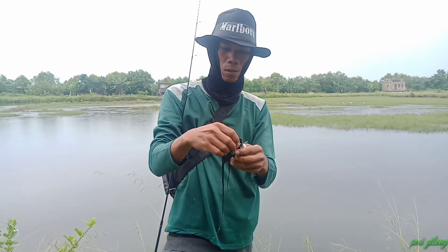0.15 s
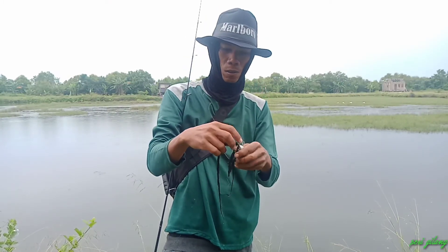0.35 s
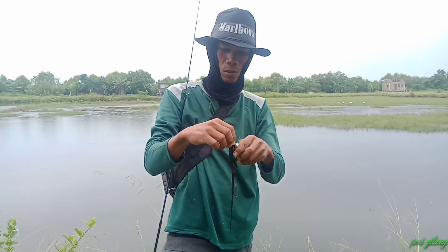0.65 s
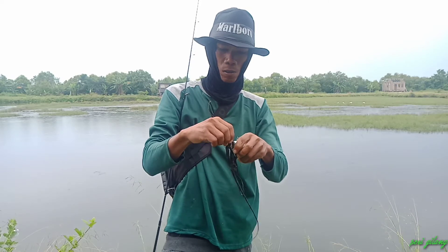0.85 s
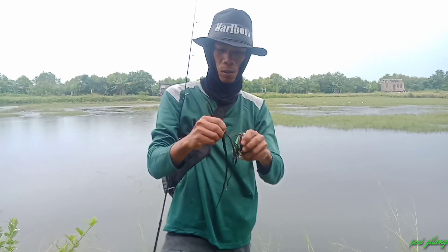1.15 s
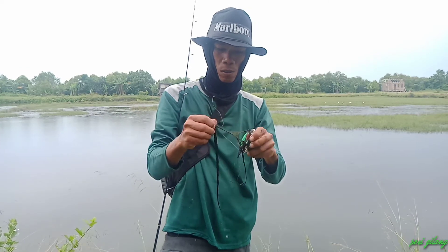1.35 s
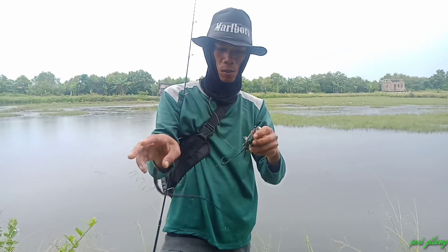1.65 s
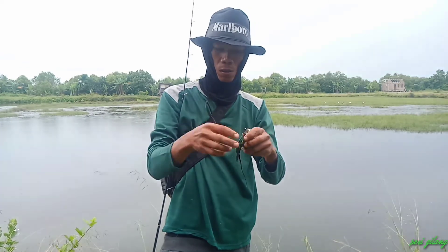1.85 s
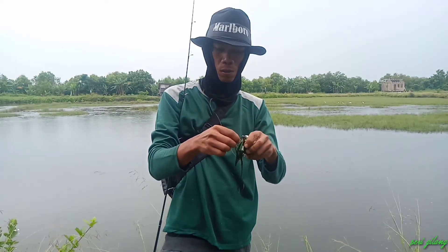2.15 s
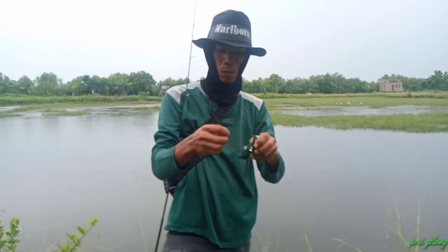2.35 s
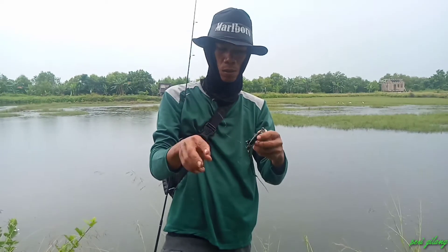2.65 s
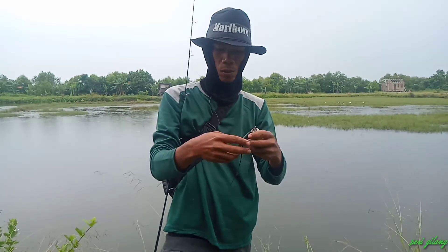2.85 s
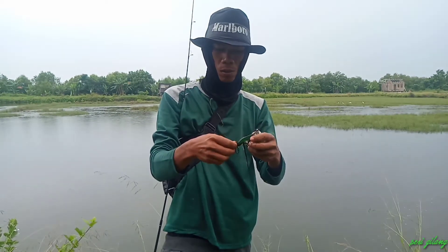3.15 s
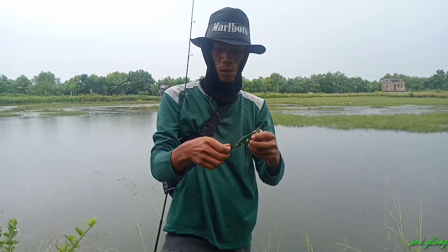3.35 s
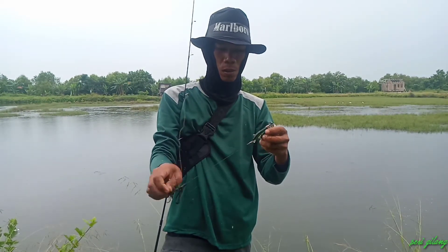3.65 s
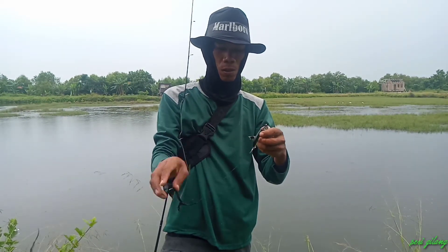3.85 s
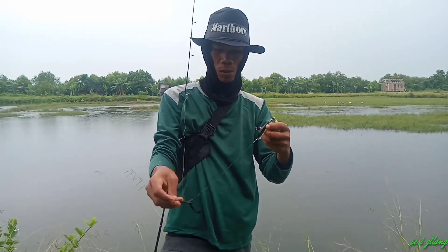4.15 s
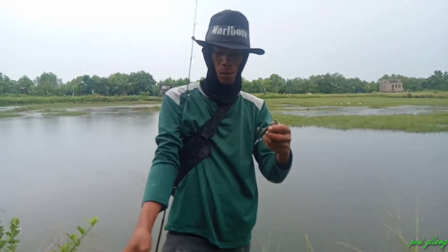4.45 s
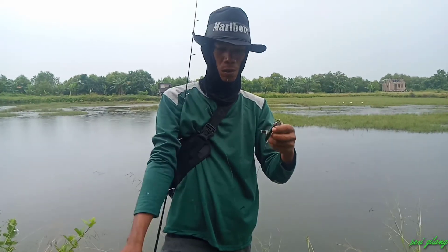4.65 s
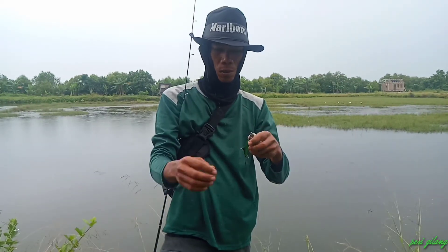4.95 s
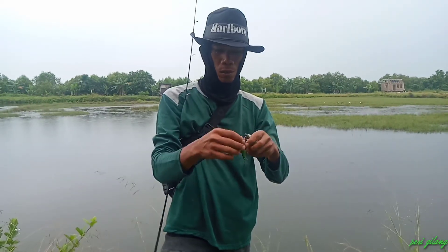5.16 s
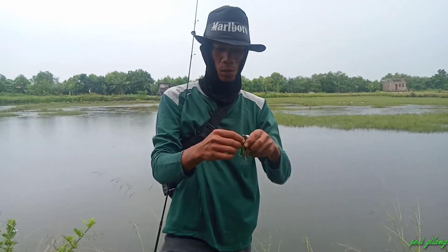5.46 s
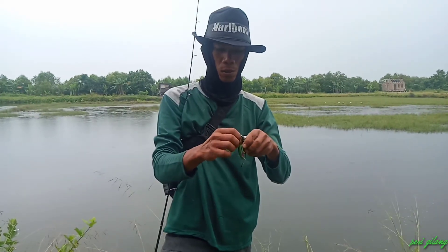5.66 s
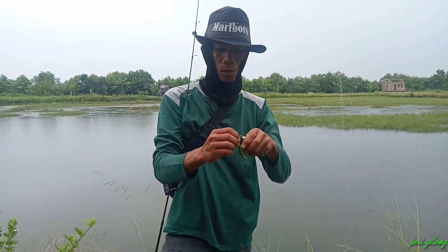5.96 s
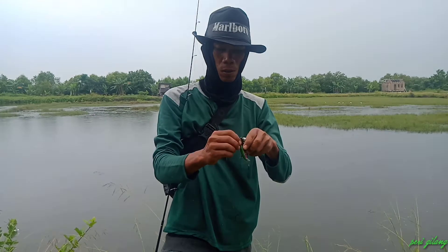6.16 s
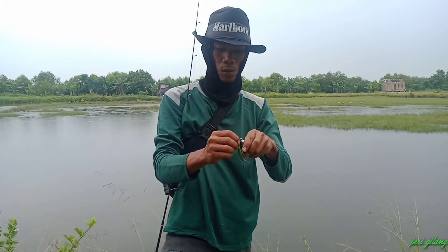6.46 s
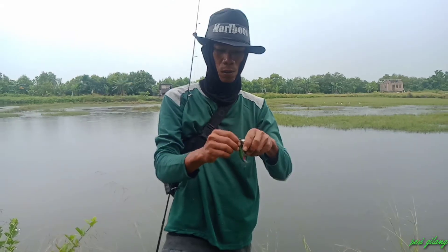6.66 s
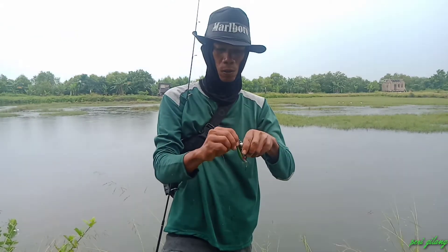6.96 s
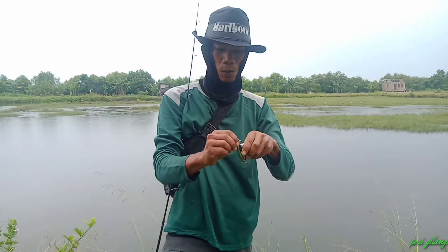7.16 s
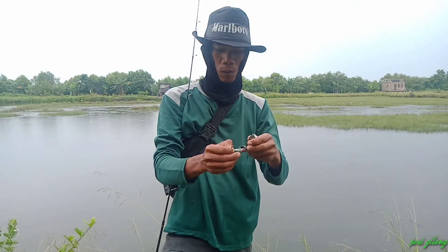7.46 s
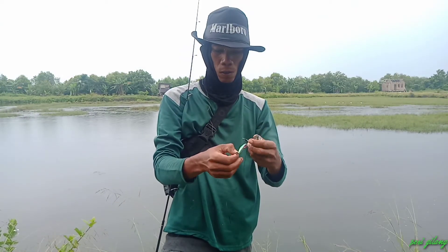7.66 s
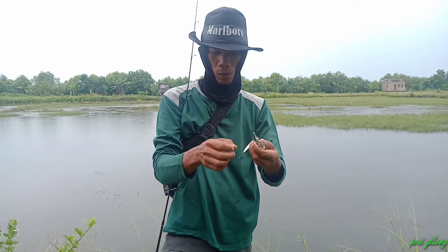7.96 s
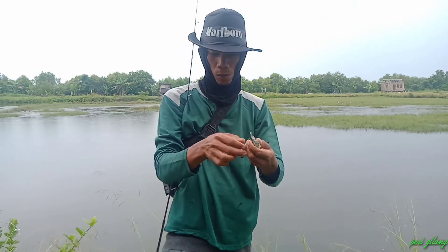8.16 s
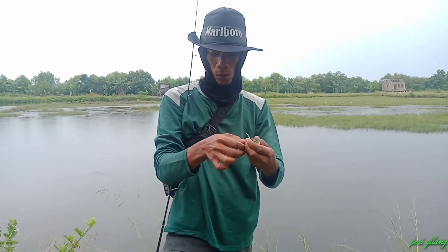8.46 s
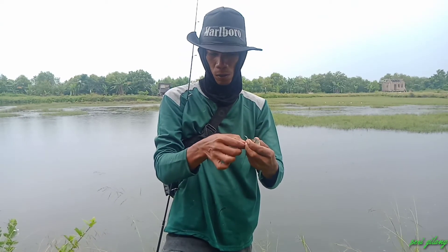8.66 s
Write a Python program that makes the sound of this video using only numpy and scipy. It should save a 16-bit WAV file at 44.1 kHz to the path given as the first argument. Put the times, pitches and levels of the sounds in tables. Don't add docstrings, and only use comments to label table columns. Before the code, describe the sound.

Whistling songbirds repeat bright phrases over a marshy pond while a near cricket trills and low wind rumbles on the microphone.

```python
import sys
import numpy as np
from scipy import signal
from scipy.fft import rfft, irfft, next_fast_len
from scipy.io import wavfile
from scipy.ndimage import uniform_filter1d, map_coordinates

SR = 44100
rng = np.random.default_rng(int(sys.argv[2]) if len(sys.argv) > 2 else 0)


def generate_wav(signal):
    frames = np.transpose(np.atleast_2d(signal))
    scaled = np.clip(frames, -1, 1) * 32767
    pcm = np.round(scaled).astype(np.int16)
    wavfile.write(sys.argv[1], SR, pcm)


def boost(x):
    u = np.asarray(x, float) / 20
    return 10 ** u


N = 388521

# (time from accent [s], pitch [Hz], level [dB])
DROP_NOTE = [(-0.004, 2800, 0.5), (0, 2787, 1.5), (0.006, 2570, -2), (0.014, 2010, -13)]


def unit(x):
    return x / np.sqrt(np.mean(x ** 2) + 1e-20)


def along(points, hz):
    f, v = np.transpose(points)
    return np.interp(np.log(hz + 1), np.log(f + 1), v)


def wobble(rate_hz):
    coarse = np.arange(0, N + 16, 16)
    knots = rng.standard_normal(int(N * rate_hz / SR) + 4)
    return np.interp(np.arange(N), coarse, map_coordinates(knots, [coarse * rate_hz / SR]))


def coloured(x, spectrum):
    m = next_fast_len(N + 8192)
    response = boost(along(spectrum, np.fft.rfftfreq(m, 1 / SR)))
    return irfft(rfft(x, m) * response, m)[:N]


def rush(spectrum, patchy_db):
    z = signal.stft(rng.standard_normal(N + 512), nperseg=512)[2]
    field = uniform_filter1d(rng.standard_normal(z.shape), size=5, axis=0)
    field = uniform_filter1d(field, size=10, axis=1)
    noise = signal.istft(z * boost(patchy_db * unit(field)), nperseg=512)[1][:N]
    return unit(coloured(noise, spectrum))


def add(track, s, sound):
    k = round(s * SR)
    sound = sound[max(-k, 0):max(len(track) - k, 0)]
    track[max(k, 0):max(k, 0) + len(sound)] += sound


def whistle(hz, db, fade_s):
    t = np.arange(len(hz)) / SR
    ends = np.clip(np.minimum(t, t[-1] - t) / fade_s, 0, 1)
    return np.sqrt(2) * boost(db) * ends * np.sin(2 * np.pi * np.cumsum(hz) / SR)


def tail(stretch):
    # (frequency [Hz], t60 [s])
    decay_s = [(500, .35), (3000, .45), (6000, .45)]
    hz, t, z = signal.stft(rng.standard_normal(SR // 2), SR, nperseg=128)
    t60_s = stretch * along(decay_s, hz)[:, None]
    answer = signal.istft(z * boost(-60 * t / t60_s), SR, nperseg=128)[1]
    return answer / np.linalg.norm(answer)


def echo(x, answer):
    return signal.oaconvolve(x, answer)[:N]


def wind():
    # (time [s], strength [dB])
    gusts = [
        (0.0, -55.5),
        (0.17, -59),
        (1.2, -56.5),
        (5.03, -57),
        (5.28, -55),
        (5.67, -60.5),
        (6.65, -52),
        (7.29, -60.5),
        (7.95, -53.5),
        (8.81, -56.5),
    ]
    # (frequency [Hz], density [dB/Hz])
    rumble_spectrum = [(12, -46), (20, -26), (32, -28.5), (65, -2), (92, 2), (153, -7), (304, -22),
                       (395, -35), (450, -48.5), (580, -60), (990, -120)]
    # (frequency [Hz], density [dB/Hz])
    grass_spectrum = [(240, -25.5), (400, -6.5), (461, -6.5), (583, -3.5), (725, -8), (797, -8), (954, -7),
                      (1260, -1), (1410, -1), (2600, -3), (3380, -30.5), (5720, -120)]
    # (frequency [Hz], density [dB/Hz])
    reed_spectrum = [(1800, -39), (2600, 1.5), (3300, 2), (4100, -2), (4600, 2), (5200, -36.5),
                     (6000, -120)]
    # (frequency [Hz], density [dB/Hz])
    hiss_spectrum = [(4500, -48), (5200, -5), (5500, -13.5), (5800, -20), (6000, -8), (6300, -1.5),
                     (7000, -2), (7500, -5.5), (7900, -16), (8400, -5.5), (9400, -9), (10000, -19.5),
                     (10800, -20.5), (15500, -22)]
    stem_spectrum = [(330, -40), (440, -3), (600, 0.5), (720, -40)]
    t = np.arange(N) / SR
    strength_db = np.interp(t, *np.transpose(gusts))
    gust_db = strength_db - strength_db.mean()

    rumble_db = -31 + 0.11 * gust_db + 0.1362 * t
    rumble = boost(rumble_db) * unit(boost(0.72 * wobble(7)) * rush(rumble_spectrum, patchy_db=1.48))
    grass_db = strength_db + 4.5 + 1.37 * wobble(9)
    grass = boost(grass_db) * rush(grass_spectrum, patchy_db=3.6)
    reeds_db = -53.5 - .2 * gust_db + 1.2 * wobble(8.1)
    reeds = boost(reeds_db) * rush(reed_spectrum, patchy_db=4.5)
    hiss = boost(-63.5) * rush(hiss_spectrum, patchy_db=1.3)
    stems_db = -64 + .7 * gust_db + 1.5 * wobble(4)
    stems = boost(stems_db) * rush(stem_spectrum, patchy_db=3)
    return rumble + grass + reeds + hiss + stems


def buffets():
    # (time [s], length [s], pitch [Hz], level [dB])
    eddies = [
        (3.708, 0.051, 87, -19.5),
        (4.494, 0.075, 79, -25),
        (6.259, 0.066, 86, -20),
        (7.501, 0.058, 95, -24.5),
    ]
    puffs = np.zeros(N)
    for at, length_s, hz, db in eddies:
        add(puffs, at, whistle(np.full(round(length_s * SR), hz), db, fade_s=length_s / 2))
    return puffs


def flock(count):
    low_hz, octaves, note_s, note_db = 900, 2.1, .085, -63
    notes = np.zeros(N)
    for when, height, length, slide, size in rng.random((count, 5)):
        u = np.arange(0, 1, 1 / ((.5 + length) * note_s * SR))
        hz = low_hz * 2 ** (octaves * height) * (1 + 0.1196 * (slide - .5) * u)
        add(notes, when * N / SR, whistle(hz, note_db + 6 * (size - .5), fade_s=.02))
    return echo(notes, tail(.6))


def dove():
    # (time [s], length [s], pitch [Hz], level [dB])
    calls = [(.04, 0.29, 488, -57), (0.801, 0.21, 511, -52.5), (1.41, 0.067, 499, -50.5),
             (1.57, 0.058, 550, -52.5), (1.93, 0.12, 600, -60.5), (4.199, 0.32, 600, -61.5),
             (4.5, 0.085, 507, -54), (5.77, 0.23, 1061, -57.5), (6.399, 0.23, 599, -63),
             (6.78, 0.057, 790, -54), (7.131, 0.042, 640, -56), (7.619, 0.12, 503, -51),
             (8.0, 0.33, 512, -54), (8.502, 0.28, 518, -61)]
    coos, waver = np.zeros(N), wobble(20)
    for at, length_s, hz, db in calls:
        u = np.arange(0, 1, 1 / (length_s * SR))
        sway = waver[round(at * SR):][:len(u)]
        add(coos, at, whistle(hz * (1.04 - 0.081 * u + 0.0306 * sway), db, fade_s=0.023))
    coos *= boost(3.5 * wobble(40))
    return .3 * coos + echo(coos, tail(.7))


def far_crickets():
    # (frequency [Hz], density [dB/Hz])
    chorus_spectrum = [(3800, -44), (4250, -28), (4600, 0.5), (4850, 1), (5050, -5.5), (5220, -29.5),
                       (5500, -47.5), (6500, -120)]
    return boost(-54.0 + 0.59 * wobble(30)) * rush(chorus_spectrum, patchy_db=1.0)


def tooth_beat(hz):
    return .6 + .33 * np.sin(2 * np.pi * np.cumsum(hz + 1.5 * wobble(3)) / SR)


def katydids():
    # (start [s], end [s])
    spans = [
        (-.7, .37),
        (.75, 1.85),
        (2.05, 2.97),
        (3.2, 4.12),
        (4.35, 5.33),
        (5.55, 6.5),
        (6.7, 7.61),
        (7.8, 8.76),
    ]
    high_spectrum = [(8650, -50), (8950, 1), (9350, 3), (9650, -3), (9950, -58)]
    low_spectrum = [(8000, -59.5), (8350, -12), (8800, 1.0), (8950, -6), (9250, -50)]
    t = np.arange(N) / SR
    bouts = np.zeros(N)
    for start, end in spans:
        bouts += (t > start) * (t < end) * boost(-5 * (end - t) / (end - start))
    high = boost(-65.5) * bouts * tooth_beat(86) * rush(high_spectrum, patchy_db=-2.0)
    low = boost(-70 + 1.2 * wobble(2.22)) * tooth_beat(85) * rush(low_spectrum, patchy_db=1.0)
    return high + low


def gnat():
    tick_times = [7.817, 7.836, 7.853, 7.878, 7.903, 7.925, 7.936, 7.955, 7.98]
    ticks = np.zeros(N)
    t = np.arange(400) / SR
    for at in tick_times:
        add(ticks, at, boost(-60.5 - 60 * t / 0.012) * np.sin(2 * np.pi * 11500 * t))
    return ticks


def hands():
    # (time [s], peak level [dB])
    clicks = [(1.056, -60), (2.120, -52), (2.309, -58), (3.769, -59), (4.293, -45), (4.307, -46),
              (4.363, -48), (5.471, -59), (7.046, -52), (7.817, -55), (7.868, -55)]
    # (time [s], peak level [dB])
    knocks = [(1.0192, -33.5), (1.2334, -40), (1.4088, -29.5), (1.9567, -33.5), (2.115, -31), (2.851, -36),
              (2.963, -34.5), (4.3585, -39), (5.049, -31), (5.371, -36), (6.2514, -34), (7.5473, -31.5),
              (8.7585, -42)]
    bright, dull = np.zeros(N), np.zeros(N)
    t = np.arange(SR // 20) / SR
    for track, events, t60_s in ((bright, clicks, .008), (dull, knocks, .03)):
        for at, db in events:
            add(track, at, boost(db - 60 * t / t60_s) * rng.standard_normal(len(t)))
    bright = coloured(bright, [(800, -30), (4000, -4), (7500, 9), (9500, 1), (12000, -5), (16000, -6)])
    dull = coloured(dull, [(700, -22), (1200, 9), (2200, 9), (4000, -4.5), (5200, -34.0)])
    return bright + dull


def chirp_times():
    # (start [s], chirps [count], cruising gap [ms], warm-up [chirps], tiring [chirps])
    bouts = [(.008, 3, 45.5, .1, .1), (.4047, 20, 41.14, 3, .5), (1.448, 24, 40.12, 3.5, 1),
             (2.693, 1, 40, 1, 1), (2.775, 1, 40, 1, 1), (2.9194, 28, 40.69, 3.5, 1.5),
             (4.346, 1, 40, 1, 1), (4.4916, 36, 38.67, 6, 8.5), (6.299, 27, 39.91, 6.5, 1),
             (7.719, 1, 40, 1, 1), (7.861, 22, 40.52, 3.5, .25)]
    cold_ms, tired_ms = 16, 14
    times = []
    for start, chirps, gap_ms, warm, tire in bouts:
        k = np.arange(chirps - 1)
        cold = cold_ms * np.exp(-(k / warm) ** 2) * (warm >= 1)
        tired = tired_ms * np.exp(-(chirps - 1 - k) / tire)
        gaps_ms = gap_ms + cold + tired
        times += list(start + np.cumsum(np.r_[0, gaps_ms]) / 1000)
    return np.array(times)


def cricket():
    # (start [s], length [s], level [dB])
    strokes = [
        (0, 0.01, -39.5),
        (.0125, .011, -40),
        (.026, 0.0083, -76),
    ]
    wing = np.zeros(N)
    chirps = chirp_times()
    gaps_s = np.diff(chirps, append=chirps[-1] + .04)
    for at, gap_s, luck in zip(chirps, gaps_s, rng.standard_normal((len(chirps), 4))):
        slow = np.clip((gap_s - .044) / 0.0065, 0, 1)
        for k, (start, length_s, db) in enumerate(strokes):
            u = np.arange(0, 1, 1 / (length_s * SR))
            hz = (4880 - 630 * u ** 1.86) * (1 + 0.0069 * luck[3])
            swell_db = -5 * (1 - u / .6) ** 2 - 7 * u ** 3
            faint_db = -2.5 * slow * (k == 0)
            add(wing, at + start, whistle(hz, db + swell_db + faint_db + 1.9 * luck[k], fade_s=.001))
    wing *= boost(1.5 * wobble(400))
    return wing + boost(-10) * echo(wing, tail(.6))


def bulbul(phrase, rasp_db, direct_db, leaves_db, slap_db, wet_db):
    early = SR // 4
    song = np.zeros(N + early)
    for shape, notes in phrase:
        s, hz, db = np.transpose(shape)
        for at, level_db, stretch, pitch in notes:
            t = np.arange(s[0] * stretch, s[-1] * stretch, 1 / SR)
            glide = uniform_filter1d(np.interp(t, s * stretch, hz * pitch), size=200, mode="nearest")
            note_db = level_db + np.interp(t, s * stretch, db)
            add(song, early / SR + at + t[0], whistle(glide, note_db, fade_s=.002))
    song[early:] *= boost(rasp_db * (0.67 * wobble(150) + 0.7 * wobble(30)))
    answer = boost(leaves_db) * tail(.25) + boost(wet_db) * tail(1.1)
    scattered = signal.oaconvolve(song, answer)[early:early + N]
    heard = boost(direct_db) * song[early:] + scattered
    add(heard, .034, boost(slap_db + 3 * wobble(60)) * song[early:])
    return heard


def second_and_third_birds():
    # (time from accent [s], pitch [Hz], level [dB])
    flick = [(0, 4180, 2), (.004, 3295, 5.5), (.011, 1950, 2)]
    hump = [(-.066, 1892, -12), (-.054, 2417, -11.5), (-.038, 2595, -8), (-.003, 2627, 1.5),
            (.01, 2420, -1), (.032, 1824, -6)]
    rise = [(-0.016, 2086, -11.5), (-0.006, 2940, 3.5), (0, 3400, -2.5), (0.006, 3870, -2)]
    fall = [(-.066, 5716, -7.5), (-.057, 5580, 0), (-.049, 5280, -3.5), (-.043, 4500, -9),
            (-.024, 3600, -1.5), (-.003, 3187, 1), (.014, 3136, -6)]
    bow = [(-0.036, 2246, -1), (-0.012, 2700, -6), (0.01, 2650, -1), (0.036, 1994, -0.5)]
    lift = [(-0.013, 3045, -11), (0, 3280, -1), (0.009, 3770, -13)]
    dive = [(-0.026, 4850, -8), (-0.01, 4010, 3.5), (0.005, 3600, -1), (0.022, 3470, -5)]
    # (hump accent [s], hump level [dB], high notes level [dB])
    songs = [
        (.585, -41, -38),
        (1.668, -39.5, -38),
        (2.531, -39.5, -36),
        (3.571, -38, -37.5),
        (4.634, -41, -36),
        (5.522, -42, -35.5),
        (6.766, -36.5, -36),
        (7.999, -37.5, -39.5),
    ]
    # (time from hump [s], level [dB], stretch [ratio], pitch [ratio])
    high_rules = [
        (-.1145, -10, 1.1, 1.001),
        (.101, -2, .93, 1.04),
        (0.1903, 0.15, 1.05, 1.008),
    ]
    # (accent [s], level [dB], stretch [ratio], pitch [ratio])
    bows = [
        (1.503, -40.5, 1.1, 0.98),
        (4.107, -39, 0.88, 1.04),
    ]
    lifts = [
        (1.617, -32.5, 0.88, 0.96),
        (4.223, -32.5, 1, 1.04),
    ]
    dives = [
        (1.67, -38.5, 0.88, 1.02),
        (4.286, -38.5, 0.86, 0.97),
    ]
    pips = [
        (1.406, -49, 1.01, 1.1),
        (4.015, -44, 1.01, 1.03),
    ]

    humps = [(s, db, .91, 0.98) for s, db, _ in songs]
    low_phrase = [(hump, humps), (bow, bows), (lift, lifts), (dive, dives)]
    high_phrase = [(DROP_NOTE, pips)]
    for shape, (after_s, step_db, stretch, pitch) in zip((flick, rise, fall), high_rules):
        high_phrase.append((shape, [(s + after_s, db + step_db, stretch, pitch) for s, _, db in songs]))
    low = bulbul(low_phrase, rasp_db=1.8, direct_db=0, leaves_db=-8, slap_db=-14, wet_db=-5)
    high = bulbul(high_phrase, rasp_db=4, direct_db=-6, leaves_db=-5, slap_db=-9, wet_db=-2)
    return low + high


def first_bird():
    # (time from accent [s], pitch [Hz], level [dB])
    tick_note = [(0, 2350, 0), (0.004, 3107, -3), (0.009, 3800, 13)]
    swoop_note = [(-.268, 4445, -18), (-.25, 3725, -14.5), (-.225, 3214, -20.5), (-.19, 3044, -19),
                  (-.13, 3013, -12.5), (-.085, 3076, -12), (-.04, 3280, -5), (-.004, 3508, -1.5),
                  (.01, 3547, -7)]
    arch_note = [(-.022, 1656, -15), (-.008, 2515, -7), (-.002, 2760, 2), (.005, 2740, 1), (.012, 2480, -7),
                 (.024, 2050, -10), (.045, 1654, -17)]
    # (tick [s], swoop accent [s], drop [s], level [dB])
    songs = [
        (-.36, -.07, .003, -30),
        (1.02, 1.307, 1.37, -28),
        (2.23, 2.521, 2.597, -28.5),
        (3.441, 3.731, 3.805, -28),
        (4.684, 4.967, 5.039, -26),
        (5.991, 6.305, 6.374, -27.5),
        (7.259, 7.561, 7.636, -27.5),
        (8.586, 8.866, 8.94, -29),
    ]
    # (level [dB], stretch [ratio], pitch [ratio])
    rules = [
        (-14.5, 1, .93),
        (0, 1.01, .995),
        (-10, .95, 1.001),
        (-7.5, 1.15, 1.005),
    ]
    swoop_s, arch_after_s = .29, .059
    ticks, swoops, drops, arches = [], [], [], []
    for tick, accent, drop, db in songs:
        tempo = (accent - tick) / swoop_s
        placed = ((ticks, tick, 1), (swoops, accent, tempo), (drops, drop, 1), (arches, drop + arch_after_s, 1))
        for (notes, at, slowing), (step_db, stretch, pitch) in zip(placed, rules):
            notes.append((at, db + step_db, slowing * stretch, pitch))
    phrase = [(tick_note, ticks), (swoop_note, swoops), (DROP_NOTE, drops), (arch_note, arches)]
    return bulbul(phrase, rasp_db=1.8, direct_db=-.5, leaves_db=-8, slap_db=-13, wet_db=-5.5)


def scene():
    # (frequency [Hz], gain [dB])
    treble_loss = [(200, 0), (4950, 0), (5150, -12), (5300, -21), (5900, -22), (6300, -34), (16000, -34)]
    air = wind() + buffets()
    far = flock(count=380) + dove() + far_crickets() + katydids() + gnat()
    singers = coloured(cricket() + second_and_third_birds() + first_bird(), treble_loss)
    return (air + far + hands() + singers)[None]


def top_cut(x):
    return signal.sosfilt(signal.butter(12, 15500, fs=SR, output="sos"), x)


def record(dry):
    return top_cut(dry - .0009)


dry = scene()
out = record(dry)
generate_wav(out)
```